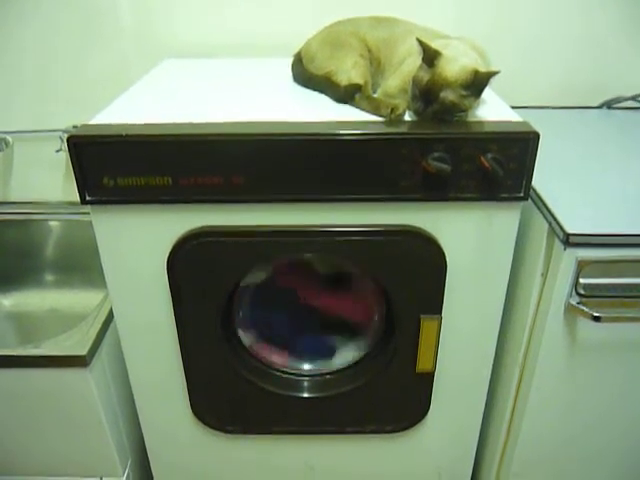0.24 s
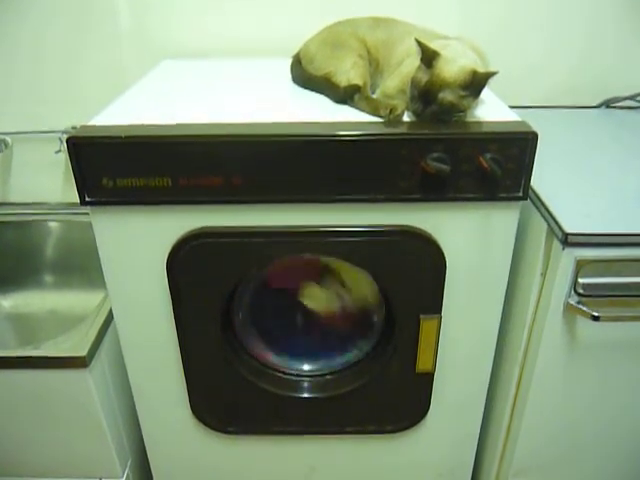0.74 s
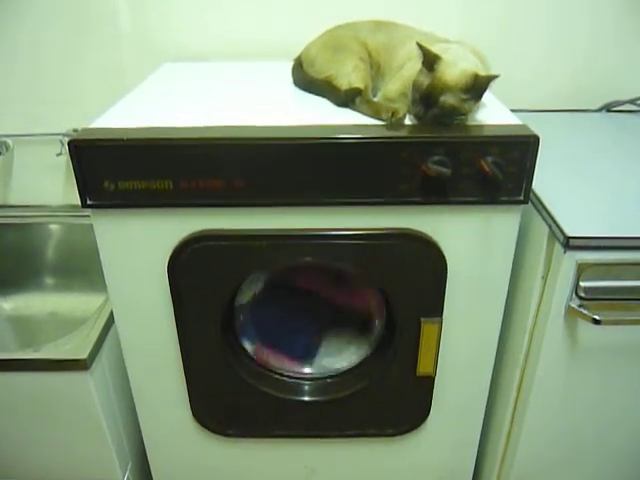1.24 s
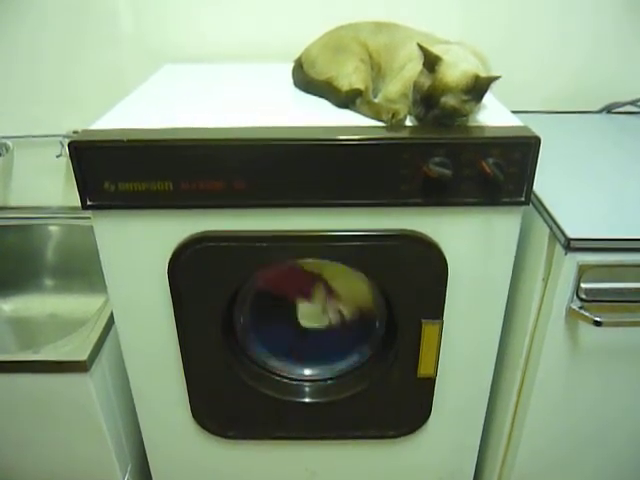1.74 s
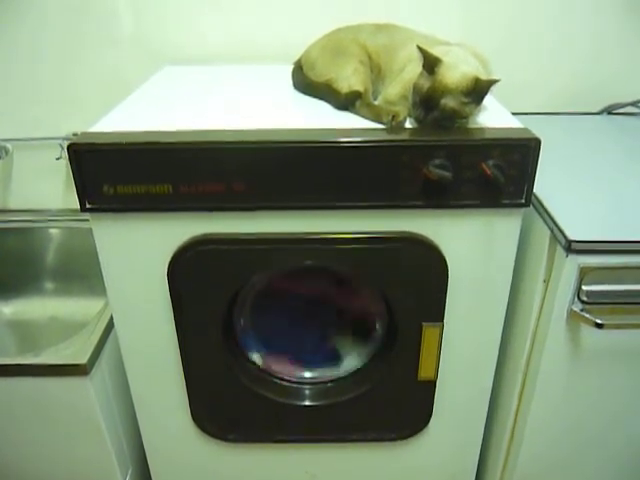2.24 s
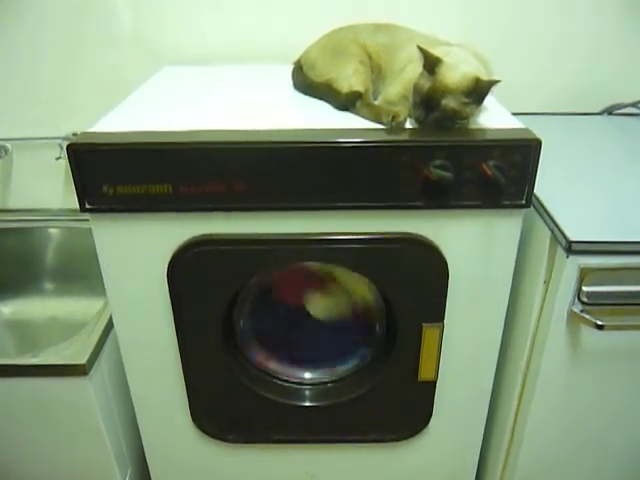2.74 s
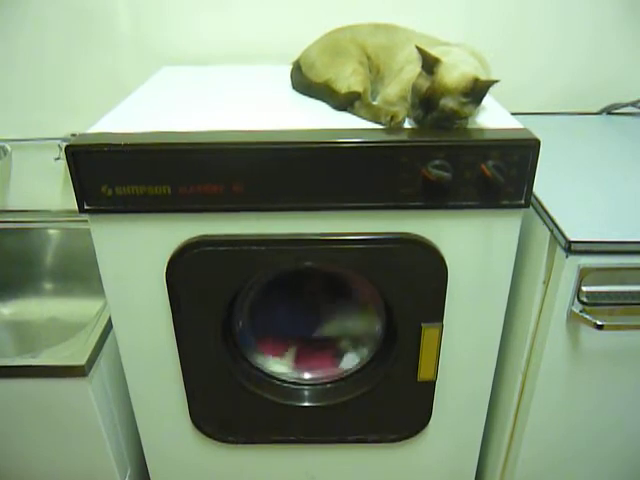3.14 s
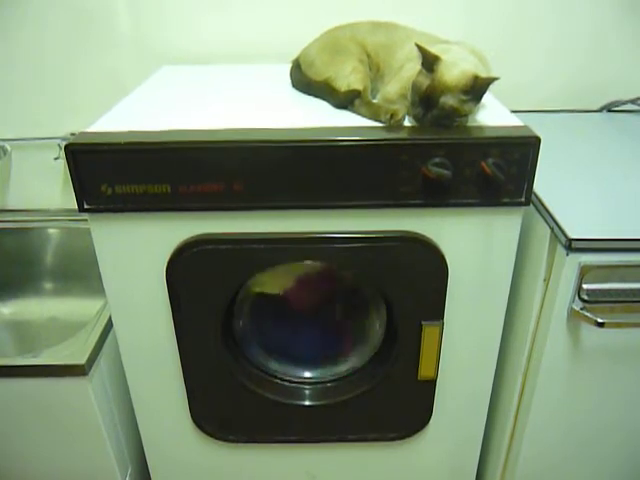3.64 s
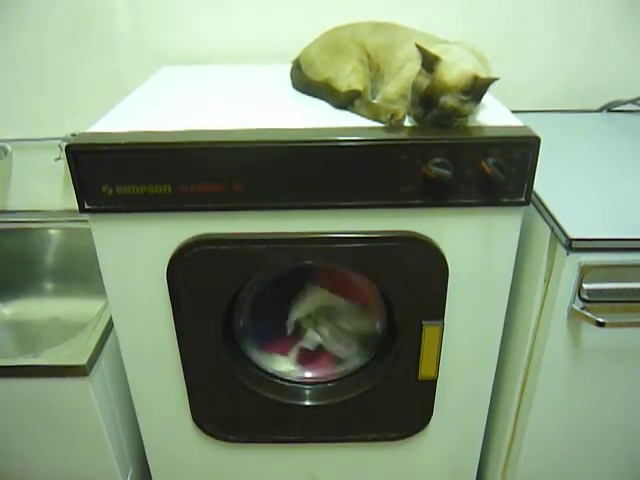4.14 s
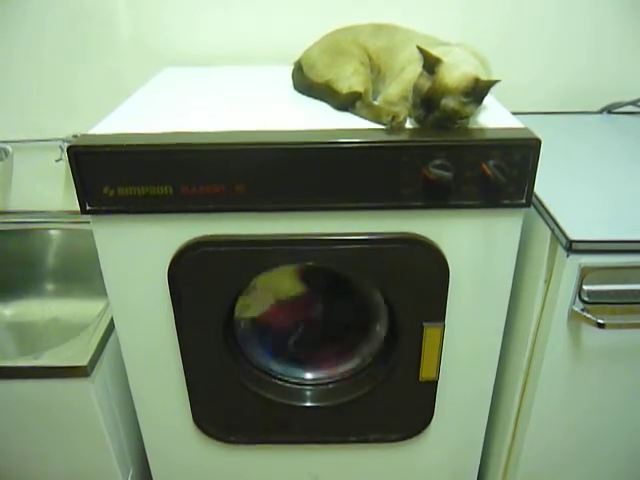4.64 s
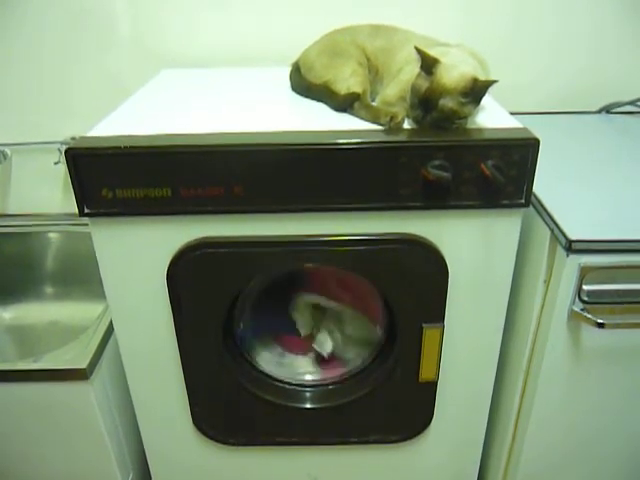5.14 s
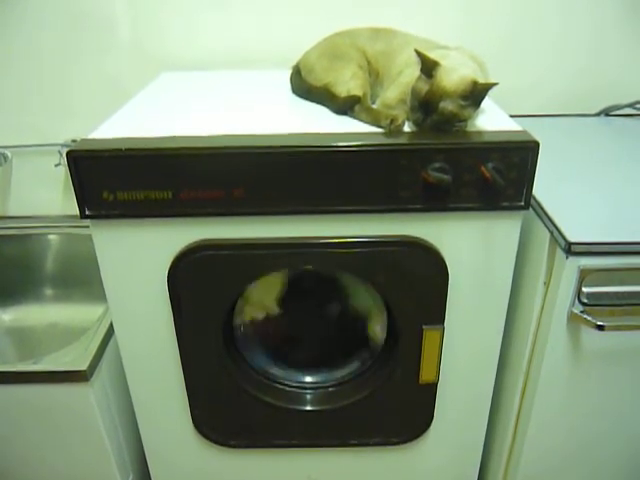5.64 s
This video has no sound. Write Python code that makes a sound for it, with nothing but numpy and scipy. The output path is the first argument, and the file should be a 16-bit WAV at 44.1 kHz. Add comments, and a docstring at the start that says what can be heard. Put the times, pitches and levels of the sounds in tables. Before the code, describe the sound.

A household tumble dryer runs throughout in a small hard-walled room. A low fan hum dominates, its pitch rising very slightly and sagging about once a second, over a softer motor hum pulsing with the drum. Hollow rushing air fills around it. One tiny sharp tick comes just after three seconds, and faint pings near five. Single-channel, muffled microphone with no high treble.

```python
"""Tumble dryer in a small hard-walled room

The fan's blade tone, a flutter-prone stack of sines, rises and sags with each tumble of the clothes.
The motor hums at twice the mains rate, a sine that swells as each of three paddles lifts the clothes.
Shaped noise is the air rushing through ringing cabinet, duct and room; late on, faint damped sines ping.
The sound passes a narrow, off-centre channel with faint hiss and a single tick."""
import sys
import numpy as np
from scipy import signal
from scipy.fft import rfft, irfft, next_fast_len
from scipy.io import wavfile
from scipy.ndimage import uniform_filter1d

SR = 44100
rng = np.random.default_rng(int(sys.argv[2]) if len(sys.argv) > 2 else 0)


def wrap_up_sound(samples):
    """Save the sound to the file named by the first command line argument, as 16-bit audio."""
    columns = np.atleast_2d(samples).T
    # keep every value between -1 and 1, then stretch to whole-number steps
    tamed = np.clip(columns, -1, 1)
    steps = np.round(tamed * 32767).astype(np.int16)
    wavfile.write(sys.argv[1], SR, steps)


N = 259749
TIME = np.arange(N) / SR  # s
SIZE = next_fast_len(N)
FREQ = np.arange(SIZE // 2 + 1) * SR / SIZE + 1e-9  # Hz, kept just above zero for logs and division


def undb(db):
    """Decibels to amplitude gain."""
    return 10 ** (np.asarray(db) / 20)


def curves(table):
    """The columns of a table, joined by straight lines in time."""
    times, *columns = np.transpose(table)
    return [np.interp(TIME, times, column) for column in columns]


def walk(rate_hz):
    """Random levels, each held 1 / rate_hz seconds, then smoothed twice and scaled to a spread of 1."""
    hold = int(SR / rate_hz)
    steps = np.repeat(rng.standard_normal(N // hold + 1), hold)
    smooth = uniform_filter1d(uniform_filter1d(steps, hold), hold)[:N]
    return smooth / smooth.std()


def above(edge_hz):
    """Weight from 0 to 1 that opens softly above an edge frequency."""
    return 1 / (1 + (edge_hz / FREQ) ** 6)


# Each tumble unloads the motor for a moment: [top speed t/s, blade rate gained f/Hz]
TUMBLE_SURGES = [(-.2, 2.43), (.76, 2.9), (1.8, 2.98), (2.8, 2.93), (3.74, 3.1), (4.8, 3), (5.7, 1.5)]
LOADED_BLADE_HZ, PICK_UP_S, SAG_S = 267.44, .42, .62


def blade_rate():
    """The motor picks up quickly into each tumble and sags more slowly towards its loaded speed."""
    rate_hz = LOADED_BLADE_HZ
    for top_s, gained_hz in TUMBLE_SURGES:
        reach_s = np.where(TIME < top_s, PICK_UP_S, SAG_S)
        place = np.clip((TIME - top_s) / reach_s, -1, 1)
        rate_hz = rate_hz + gained_hz * np.cos(np.pi / 2 * place) ** 2
    return rate_hz


MEAN_BLADE_HZ = 269.04  # reference speed for the speed-dependent levels
BLADE_DB_PER_HZ = -.5
SWELL_S, SWELL_PEAK_S, SWELL_DB = .567, 0.57, 1  # period, time of a peak, depth either way


def blade_level(blade_db, blade_hz):
    """The blade tone swells about twice a turn and softens slightly as the fan speeds up."""
    swell_db = SWELL_DB * np.cos(2 * np.pi * (TIME - SWELL_PEAK_S) / SWELL_S)
    return blade_db + swell_db + BLADE_DB_PER_HZ * (blade_hz - MEAN_BLADE_HZ)


# Overtones of the blade tone:
# [multiple of blade rate, RMS level/dB at reference speed, level change/(dB per Hz), flutter spread/dB]
BLADE_OVERTONES = [(2, -54.5, 1.9, 2), (3, -40.5, 3, 1.5), (4, -39.5, -0.5, 1.5), (5, -57, 3, 2)]
BLADES = 11
SHAFT_DB = -75.5  # RMS level of the unbalance, heard at twice the shaft rate


def fan(blade_hz, blade_db):
    """Blades pass the housing's tongue; eddies make the tone and its overtones flutter."""
    wavering_hz = blade_hz + .15 * walk(12)
    phase = 2 * np.pi * np.cumsum(wavering_hz) / SR
    tone = undb(blade_db + 0.5 * walk(25)) * np.sin(phase)
    for multiple, mean_db, db_per_hz, flutter_db in BLADE_OVERTONES:
        # nearby resonances make an overtone's level depend on speed
        speed_db = db_per_hz * (blade_hz - MEAN_BLADE_HZ)
        level_db = mean_db + speed_db + flutter_db * walk(13)
        tone = tone + undb(level_db) * np.sin(round(multiple) * phase + .25 * walk(15))
    unbalance = undb(SHAFT_DB) * np.sin(2 * phase / BLADES)
    return np.sqrt(2) * (tone + unbalance)  # root 2 turns RMS levels into peaks


# Each paddle lifts the clothes and loads the motor: [place/share of a turn, hum rise level/dB]
PADDLE_LIFTS = [(0, 7.5), (.38, 4), (.7, 5)]
TURN_S, FIRST_LIFT_S = 1.096, .18
LIFT_SHARE, HUM_DB = .09, -45.5  # bump spread in turns, RMS hum level before the bumps


def hum_level():
    """One bell-shaped bump in level per paddle, the same every turn."""
    turn = (TIME - FIRST_LIFT_S) / TURN_S
    level_db = HUM_DB
    for place, rise_db in PADDLE_LIFTS:
        distance = (turn - place + .5) % 1 - .5  # turns to the nearest lift by this paddle
        level_db = level_db + rise_db * np.exp(-.5 * (distance / LIFT_SHARE) ** 2)
    return level_db


MAINS_HUM_HZ = 100.05  # twice the mains rate


def motor(hum_db):
    """The magnetic pull shakes the frame twice per mains cycle, harder under load."""
    phase = 2 * np.pi * MAINS_HUM_HZ * TIME + .15 * walk(3.7)
    return np.sqrt(2) * undb(hum_db) * np.sin(phase)


# Rushing air before resonances and slow levels: [f/Hz, density level/dB per Hz]
AIR_SPECTRUM = [(40, -87.5), (60, -85), (90, -69), (140, -66.5), (225, -68.5), (440, -70), (700, -64),
                (980, -72.5), (1270, -69), (1700, -74), (2700, -75.5), (3600, -84.5), (4050, -93.5),
                (4400, -110)]
# Resonances of cabinet, duct and room: [f/Hz, bandwidth f/Hz, level/dB relative to the rush]
AIR_RESONANCES = [(169.9, 13, 12.5), (207, 11, 12), (254.2, 16, 15), (290.7, 9, 15.5), (320, 23, 14),
                  (365.6, 14, 13.5), (389, 62, 11.5), (496, 30, 10), (547, 22, 11), (647.7, 22, 8.5),
                  (711.4, 16, 7), (825, 52, 9.5), (890, 21, 11), (948, 27, 12), (1010, 9, 14),
                  (1053, 28, 16), (1114, 15, 14.5), (1168, 11, 15), (1213, 13, 10.5), (1349, 26, 6.5),
                  (1468, 15, 11), (1560, 8.9, 6), (1590, 50, 1), (1741, 17, 5), (1856, 6.2, 5),
                  (1900, 6.5, 5), (1966, 18, 8.5), (2144, 54, 3.5), (2389, 27, 2.5), (2906, 10, 5.5)]
RUSTLE_HZ = 1490  # soft split between the low rush and the high rustle
ROOM_T60_S, ROOM_DB, ROOM_HZ = .4, -9, 1500  # decay, echo level, soft lower edge of the echoes


def rush(rush_db, rustle_db):
    """Turbulent air coloured by resonances; higher up the dense room modes ripple the spectrum."""
    ring = 1  # power gain
    for mode_hz, width_hz, gain_db in AIR_RESONANCES:
        ring = ring + undb(gain_db) ** 2 / (1 + (2 * (FREQ - mode_hz) / width_hz) ** 2)
    air_hz, air_db = np.transpose(AIR_SPECTRUM)
    density = undb(np.interp(np.log(FREQ), np.log(air_hz), air_db))
    colour = density * np.sqrt(ring * SR / 2)  # density per Hz to a gain for white noise

    echoes = rng.standard_normal(SR // 2) * undb(-60 * TIME[:SR // 2] / ROOM_T60_S)
    echo_spectrum = rfft(echoes / np.linalg.norm(echoes), SIZE)
    wet = undb(ROOM_DB) * above(ROOM_HZ)
    room = (1 + wet * echo_spectrum) / np.sqrt(1 + wet ** 2)  # keeps the average power

    air = rfft(rng.standard_normal(SIZE)) * colour * room
    high = above(RUSTLE_HZ)
    low_part = irfft(air * (1 - high), SIZE)[:N]
    high_part = irfft(air * high, SIZE)[:N]
    return undb(rush_db) * low_part + undb(rustle_db + .5 * walk(6.8)) * high_part


# Faint brief pings in the upper rush: [onset t/s, f/Hz, level/dB at onset, 60 dB decay t/s]
PING_EVENTS = [(4.958, 2101, -39, .1), (5.09, 2600, -41, .08), (5.105, 2090, -35, .12),
               (5.12, 2720, -37.5, 0.18), (5.168, 2100, -37, 0.11)]


def pings():
    """Each ping is one damped sine with a 4 ms fade-in."""
    out = 0
    for onset_s, hz, level_db, t60_s in PING_EVENTS:
        since = np.maximum(TIME - onset_s, 0)
        envelope = undb(level_db - 60 * since / t60_s) * np.minimum(since / .004, 1)
        out = out + envelope * np.sin(2 * np.pi * hz * since)
    return out


# Slow drift of the airflow: [t/s, blade tone RMS level/dB before swells, rush level/dB, rustle level/dB]
FLOW_LEVELS = [(0, -26, 0.16, 0), (1.5, -26.5, 0.34, -.5), (3, -27.2, 0, -0.45), (4.3, -27, -0.5, -.8),
               (5.12, -27, .6, 0), (5.89, -26.5, 0, -1.1)]


def scene():
    """Fan, motor, air and pings summed at one microphone."""
    flow_db, rush_db, rustle_db = curves(FLOW_LEVELS)
    blade_hz = blade_rate()
    blade_db = blade_level(flow_db, blade_hz)
    mix = fan(blade_hz, blade_db) + motor(hum_level()) + rush(rush_db, rustle_db) + pings()
    return mix[None]  # one channel


MIC_TOP_HZ, TOP_HZ = 4330, 15900  # steep upper edges of the scene and of the finished sound
TICK_S, TICK_DB, TICK_DECAY_S = 3.15998, -17, .0002  # onset, peak level, time to fall to 1/e
OFFSET, HISS_DB = -.0581, -101  # share of full scale, RMS level before the top is cut


def record(dry):
    """A narrow channel with a constant offset and faint hiss; one sharp tick; the top is cut."""
    narrow_filter = signal.ellip(9, .2, 70, MIC_TOP_HZ, fs=SR, output="sos")
    narrow = signal.sosfilt(narrow_filter, dry)
    since = TIME - TICK_S
    tick = undb(TICK_DB) * (since >= 0) * np.exp(-np.abs(since) / TICK_DECAY_S)
    hiss = undb(HISS_DB) * rng.standard_normal(dry.shape)
    top_filter = signal.ellip(7, .1, 40, TOP_HZ, fs=SR, output="sos")
    # run forwards and backwards, so the tick rings on both sides
    return signal.sosfiltfilt(top_filter, narrow + tick + OFFSET + hiss)


dry = scene()
out = record(dry)
wrap_up_sound(out)
```